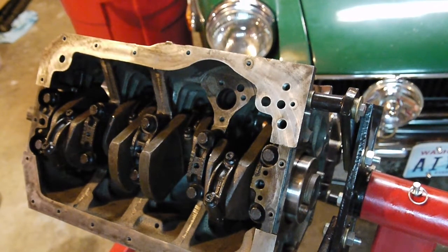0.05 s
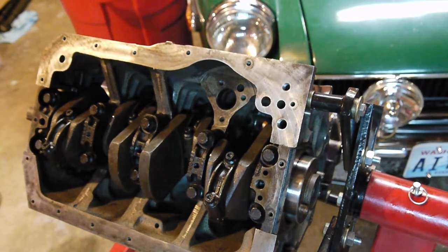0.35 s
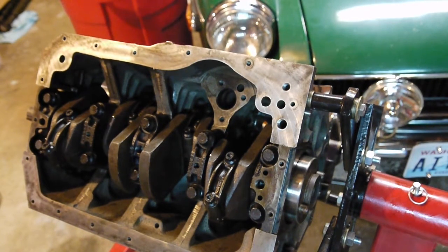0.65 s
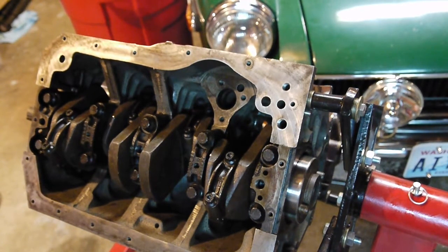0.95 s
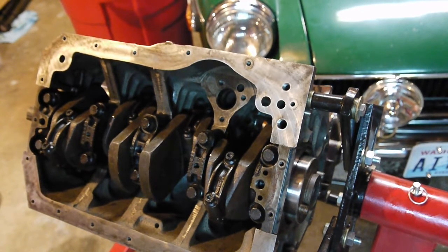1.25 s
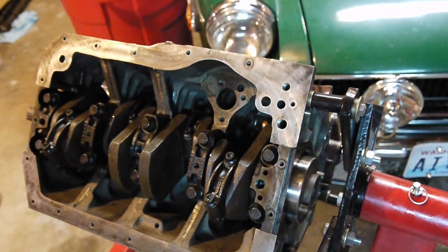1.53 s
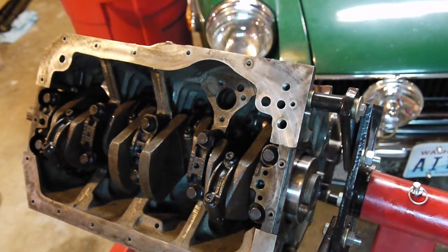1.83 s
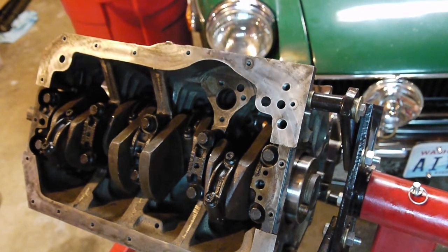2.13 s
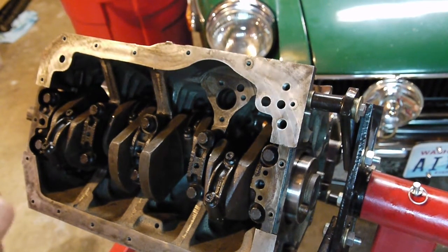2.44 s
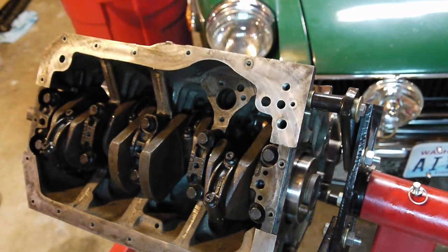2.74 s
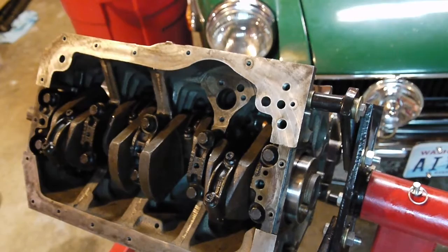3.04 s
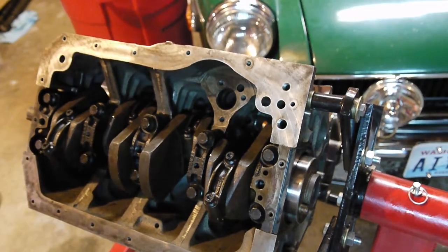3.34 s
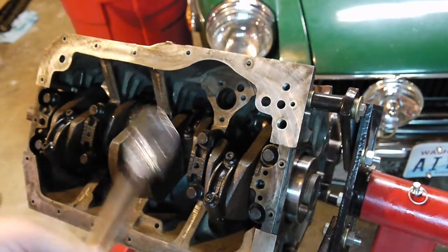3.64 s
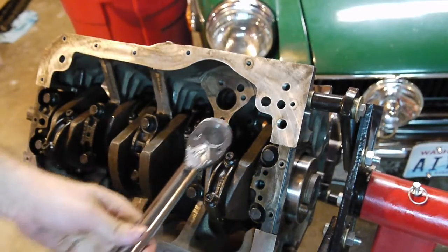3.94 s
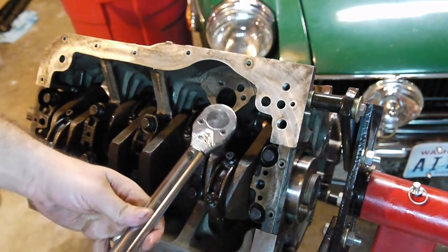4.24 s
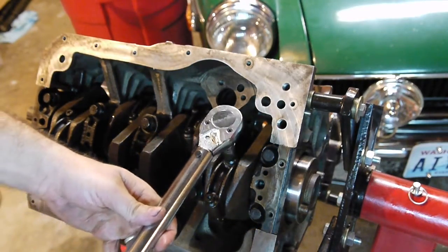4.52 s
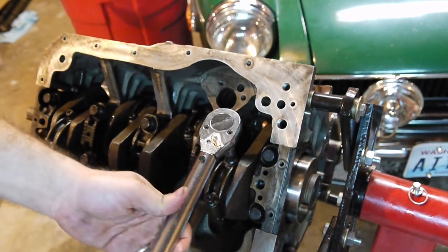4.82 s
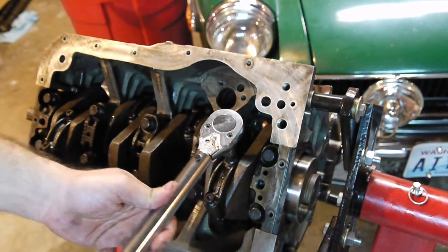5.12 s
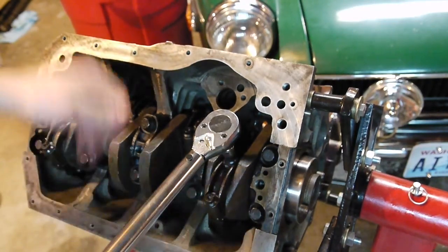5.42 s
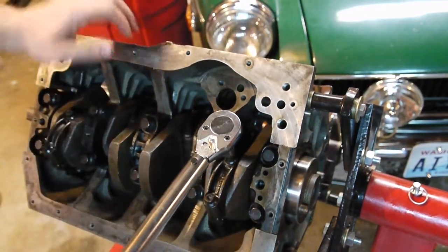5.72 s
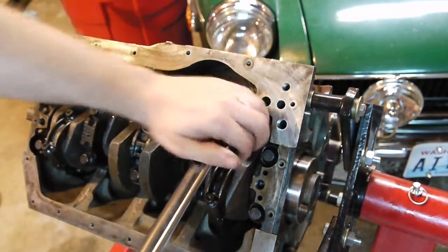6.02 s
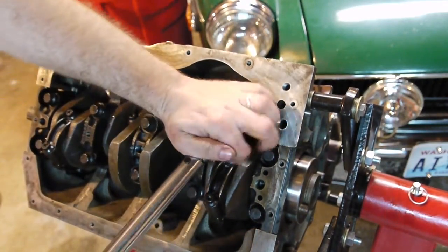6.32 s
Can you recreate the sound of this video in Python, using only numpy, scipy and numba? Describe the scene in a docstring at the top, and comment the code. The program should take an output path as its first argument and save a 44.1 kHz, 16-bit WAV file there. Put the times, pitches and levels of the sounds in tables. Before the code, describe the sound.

A torque wrench clinks softly as it is handled, then clacks onto a bolt between swishes of cloth, over faint room hiss.

```python
"""Light steel clicks and a short scrape as a torque wrench is picked up in a small workshop.
A sleeve swishes as the arm reaches over, the socket clacks down onto a bearing-cap bolt of a bare
engine block, and a hand settles on the ratchet head. Contacts crack and ring the tool's modes;
cloth and skin hiss as they slide. One close microphone, steady room air, faint lamp hum."""
import sys
import numpy as np
from scipy import signal
from scipy.fft import rfft, irfft
from scipy.io import wavfile
from scipy.ndimage import uniform_filter1d
from numba import njit

SR = 44100
rng = np.random.default_rng(int(sys.argv[2]) if len(sys.argv) > 2 else 0)


def transcribe(signal):
    """Save signal, clipped to [-1, 1], as a 16-bit WAV file at the path in sys.argv[1]."""
    frames = np.atleast_2d(signal).T
    limited = np.clip(frames, -1, 1)
    pcm = np.round(limited * 32767).astype(np.int16)
    wavfile.write(sys.argv[1], SR, pcm)


N = 280808
T = np.arange(N) / SR

# Spectrum of a steel contact. Each row: frequency in Hz, level in dB.
STEEL_SPECTRUM = [(100, -29), (350, -14), (1000, -7.5), (1900, -3), (2800, -1.5), (4000, -0.5),
                  (4850, -3.5), (5700, -1.5), (7800, -6), (9700, -4.5), (12500, -11.5), (15500, -26)]
# Modes of the wrench with its socket. Each row: frequency in Hz, level in dB, t60 in seconds.
WRENCH_MODES = [(1647, -5.5, 0.15), (2205, -0.5, .22), (2630, 0, 0.17), (2810, 4, 0.19), (3250, -17, .13),
                (3680, -12, .12), (4150, -3, .24), (4100, -6, 0.11), (4550, -4, 0.14), (4440, -12, 0.42),
                (5230, -5, 0.098), (5450, -5, 0.067), (5450, -11, 0.057), (6250, -14, 0.22),
                (7004, -14, .15), (8650, -7, 0.13)]
# Modes of the ratchet head. Each row: frequency in Hz, level in dB, t60 in seconds.
HEAD_MODES = [(1274, -10, 0.29), (6200, -19, 0.41), (9680, 1, 0.17), (9950, 0, 0.12)]


def socket_clacks(head_db=-5.5, rebounds=2, rebound_s=0.0052, rebound_step_db=0.5):
    """One edge touches the bolt, the full blow follows and rings the tool, then the socket rattles."""
    # Each row: touch time in seconds, touch level in dB, touch resonance in Hz, lag to the blow in
    # seconds, blow level in dB, blow resonance in Hz, chatter t60 in seconds, then rattle level,
    # body boost, treble boost and ring level in dB.
    clacks = [ (4.3922, -22, 3900, 0.0027, -19.5, 5600, 0.0083, -27, -19, -1.5, -43),
              (4.4612, -26.5, 6950, 0.0041, -27, 4450, 0.03, -43, 4, 7, -42.5),
              (4.549, -38.5, 2210, 0.0035, -27.5, 2460, 0.015, -58, -3.5, -1, -40.5)]
    out = np.zeros(N)
    for (touch_s, touch_db, touch_hz, lag_s, blow_db, blow_hz, t60_s,
         rattle_db, body_db, treble_db, ring_db) in clacks:
        blow_s = touch_s + lag_s
        add(out, touch_s, undb(touch_db) * crack(STEEL_SPECTRUM, t60_s, body_db, treble_db, touch_hz))
        add(out, blow_s, undb(blow_db) * crack(STEEL_SPECTRUM, t60_s, body_db, treble_db, blow_hz))
        add(out, blow_s, undb(ring_db) * (ring(WRENCH_MODES) + undb(head_db) * ring(HEAD_MODES)))
        for k in range(rebounds):
            rebound = crack(STEEL_SPECTRUM, t60_s=0.026, treble_db=9, ping_hz=touch_hz)
            add(out, blow_s + (k + 1) * rebound_s, undb(rattle_db + k * rebound_step_db) * rebound)
    return out


def wrench_clicks(ring_offset_db=-9.5):
    """Handling contacts crack and ring shaft and head; heavier ones thud; the loose socket snaps once."""
    # Each row: start in seconds, level in dB, body and treble boosts in dB, contact resonance in Hz,
    # chatter t60 in seconds, wrench and head ring in dB re level plus ring_offset_db.
    clicks = [ (0.473, -49.5, 10, -6, 1200, 0.022, -20, -35), (0.651, -48, 18, -4, 2970, 0.028, -20, -40),
              (1.5304, -39.5, 20.5, 7, 7100, 0.021, -20, -29),
              (1.6122, -36.5, 6, 2.5, 6570, 0.02, -20, -28), (1.6884, -34, 7, -4, 1250, 0.02, -13, -28),
              (1.76, -40.5, 4, -10, 3980, 0.057, 0, -30), (2.067, -50.5, 8, -17, 1600, 0.037, -14, -40),
              (2.555, -37, 1.5, -4.5, 2880, 0.01, -11, -35),
              (2.5844, -40.5, 10.5, 3, 1020, 0.019, -22, -35), (2.6155, -49, -2, -10, 3000, .006, -20, -40),
              (4.5695, -43, -7, 18, 9800, 0.009, -16, -20), (4.9117, -53, 9, -19, 3200, .015, -9, -35),
              (6.1072, -31, 5, -1, 6500, 0.02, -10, -1.5), (6.162, -49, 2, -10, 10200, .012, -22, -14),
              (6.3041, -46, -5, -21, 1700, .012, -20, -22), (6.3077, -38, 10, -6.5, 10000, .013, -19, -0.5)]
    # Each row: start in seconds, level in dB.
    thuds = [(2.5859, -44), (6.1066, -45)]
    # Each row: frequency in Hz, level in dB, t60 in seconds.
    thud_modes = [(398, 0, 0.055), (467, 0, 0.057), (860, -4.5, 0.06)]
    # Socket against its drive square, heard as one snap. Each row: start in seconds, level in dB.
    snap_contacts = [(4.0075, -30), (4.0079, -27), (4.0084, -27)]
    # Each row: frequency in Hz, level in dB.
    snap_spectrum = [(300, -36), (1800, -14), (3500, -1), (6000, -12), (9500, -10), (11600, 0.5),
                     (12500, -2), (13800, -15), (15500, -24)]
    out = np.zeros(N)
    for start_s, db, body_db, treble_db, ping_hz, t60_s, wrench_db, head_db in clicks:
        add(out, start_s, undb(db) * crack(STEEL_SPECTRUM, t60_s, body_db, treble_db, ping_hz))
        ringing = undb(wrench_db) * ring(WRENCH_MODES) + undb(head_db) * ring(HEAD_MODES)
        add(out, start_s, undb(db + ring_offset_db) * ringing)
    for start_s, db in thuds:
        add(out, start_s, undb(db) * ring(thud_modes))
    for start_s, db in snap_contacts:
        add(out, start_s, undb(db) * crack(snap_spectrum, t60_s=0.0047))
    return out


def tool_drag(level_db=-45, jerks_per_s=2200, scatter_db=3, ring_db=-11):
    """Steel slips over a rough surface in dense little jerks, which also ring the wrench."""
    # Each row: frequency in Hz, level in dB.
    drag_spectrum = [(300, -17), (850, -9), (1300, 6.5), (1650, 0), (2200, -3), (3000, 4), (5000, -10),
                     (7000, -9), (9900, -1.5), (12000, -16), (15500, -30)]
    jerks = (rng.random(N) < jerks_per_s / SR) * rng.choice([-1, 1], N)
    jerks = jerks * undb(scatter_db * rng.standard_normal(N))
    lift = envelope(start_s=1.688, end_s=1.762, attack_s=0.007, release_t60_s=0.054)
    scrape = undb(level_db) * unit(colour(jerks, drag_spectrum)) * lift
    ringing = signal.fftconvolve(scrape, ring(WRENCH_MODES))[:N]
    return scrape + undb(ring_db) * np.std(scrape) * unit(ringing)


def sleeve_swish(flutter_db=1.3, pressed_db=-40):
    """Countless fibres slip at once: a hiss, hollow on light strokes, even with the folds pressed flat."""
    # Cloth sliding on cloth. Each row: frequency in Hz, level in dB.
    cloth_spectrum = [(300, -33), (450, -7.5), (620, -8.5), (1000, -7.5), (1500, -8.5), (2050, -9),
                      (2900, -1.5), (3800, -0.5), (4800, -2.5), (5900, -4.5), (7700, -10), (11500, -16),
                      (13500, -29), (15800, -41)]
    # Hollow colour of loose folds. Each row: frequency in Hz, gain in dB.
    fold_response = [(400, -2), (620, 4), (1000, 0.5), (1500, -4.5), (2300, 0), (3250, 1.5), (5100, -1),
                     (6000, 3.5), (7300, -1), (9200, 4.5), (10200, 4), (11500, 6)]
    bands_hz = [(380, 2000), (2000, 7200), (7200, 17000)]  # body, hiss, fine hiss
    fibres = colour(rng.standard_normal(N), cloth_spectrum)
    hollow = colour(fibres, fold_response)
    gains = sleeve_gains()
    loose = 1 / (1 + (gains[1] / undb(pressed_db)) ** 3)
    out = np.zeros(N)
    for gain, edges_hz in zip(gains, bands_hz):
        out += gain * ((1 - loose) * unit(band(fibres, *edges_hz)) + loose * unit(band(hollow, *edges_hz)))
    return out * undb(flutter_db * wander(rate_hz=60))


def sleeve_gains():
    """Gains of body, hiss and fine hiss: strokes swell to their fastest moment, ease off, add in power."""
    # Each row: start, fastest moment and end in seconds, level in dB, slope in dB per second,
    # body and fine hiss in dB re the hiss.
    strokes = [ (3.183, 3.23, 3.29, -52.5, 35, -4, -4), (3.285, 3.461, 3.545, -45, 63, -8, 0),
               (3.504, 3.543, 3.571, -41.5, 68, -6.5, -8), (3.689, 3.8, 3.87, -54, 30, -13.5, -6),
               (3.815, 4.106, 4.187, -32.5, 33.5, -9.5, -5), (4.938, 5.08, 5.09, -59.5, 38, -12, 4),
               (5.38, 5.78, 6.1, -53.5, 18, -4, -8), (5.5, 5.637, 5.64, -29.5, 100, -14.5, -7)]
    power = np.zeros((3, N))
    for start_s, fastest_s, end_s, db, slope_db_per_s, body_db, fine_db in strokes:
        swell = undb(db - slope_db_per_s * np.abs(T - fastest_s))
        gain = swell * envelope(start_s, end_s, attack_s=0.049, release_t60_s=0.3)
        power += np.outer(undb([body_db, 0, fine_db]), gain) ** 2
    return np.sqrt(power)


def hand_brushes(relative_width=0.48):
    """Skin slides over steel in short, soft swells."""
    # Each row: peak time in seconds, length in seconds, level in dB, band centre in Hz.
    brushes = [(0.46, .05, -61.5, 8000), (1.81, 0.041, -55.5, 11000), (2.12, .04, -60, 10500),
               (2.33, 0.14, -62.5, 10700), (2.805, .025, -61.5, 10000), (3.06, 0.14, -63.5, 10400),
               (4.983, 0.036, -57, 5400), (5.074, .07, -58.5, 5000), (6.214, 0.13, -65, 3450)]
    out = np.zeros(N)
    for peak_s, length_s, db, hz in brushes:
        swell = np.exp(-(2 * (T - peak_s) / length_s) ** 2)
        out += undb(db) * swell * noise_band(hz, relative_width * hz)
    return out


def workshop_echoes(x, early_db=-9, early_t60_s=0.14, tail_db=-13, tail_t60_s=0.42, size=24000):
    """Block and floor throw back near echoes; the walls add a short, duller tail."""
    # Each row: frequency in Hz, level in dB.
    wall_spectrum = [(200, 3.0), (4500, -2.5), (9000, -3.5), (15000, -9.5)]
    t = T[:size]
    early = rng.standard_normal(size) * (rng.random(size) < 0.15)
    early *= (t > 0.002) * fade(t, early_t60_s)
    tail = colour(rng.standard_normal(size), wall_spectrum)
    tail *= np.clip(t / 0.016 - 0.5, 0, 1) * fade(t, tail_t60_s)  # builds from 8 to 24 ms
    echoes = undb(early_db) * early / np.linalg.norm(early) + undb(tail_db) * tail / np.linalg.norm(tail)
    return x + signal.fftconvolve(x, echoes)[:N]


def lamp_hum(mains_hz=60):
    """The lamps hum, and sizzle on each half cycle of the mains, unevenly for the two halves."""
    # Each row of both: centre in Hz, width in Hz, level in dB.
    hum_bands = [(118.6, 3, -79.5), (241, 4.1, -71.5)]
    sizzle_bands = [(10030, 300, -76.5), (10900, 480, -72.5)]
    hum = sum(undb(db) * noise_band(hz, width_hz) for hz, width_hz, db in hum_bands)
    sizzle = sum(undb(db) * noise_band(hz, width_hz) for hz, width_hz, db in sizzle_bands)
    mains = np.cos(2 * np.pi * mains_hz * T)
    pulses = unit((0.3 + mains ** 8) * (1 + 0.2 * mains))
    return hum + pulses * sizzle


def room_air(level_db=-55, drift_db=0.34):
    """Room air and microphone hiss, nearly constant in level."""
    # Each row: frequency in Hz, level in dB.
    air_spectrum = [(25, -32), (50, -13), (100, -6), (170, -1.5), (330, 0.5), (600, -1), (1200, -5.5),
                    (2500, -9.5), (5000, -14.5), (9000, -20), (11500, -18), (13000, -24.5), (15800, -30.5)]
    noise = unit(colour(rng.standard_normal(N), air_spectrum))
    return noise * undb(level_db + drift_db * wander(rate_hz=5.14))


def crack(spectrum, t60_s, body_db=0, treble_db=0, ping_hz=0, ping_db=7, ping_width=0.27, size=4096):
    """Burst of dense, quickly damped vibration, with the energy of 5 ms at rms 1."""
    hz = np.fft.rfftfreq(size, 1 / SR)
    db = spectrum_db(spectrum, hz)
    db += body_db / (1 + ((hz - 1400) / 700) ** 2)
    db += treble_db * (1 - 1 / (1 + (hz / 5500) ** 4))
    if ping_hz:  # stiffer, lighter contacts resonate higher
        db += ping_db / (1 + ((hz / ping_hz - 1) / ping_width) ** 2)
    burst = rfft(rng.standard_normal(size) * fade(T[:size], t60_s))
    burst /= np.sqrt(uniform_filter1d(np.abs(burst) ** 2, size=150))  # whiten
    # minimum phase: nothing sounds before the contact
    cepstrum = irfft(np.log(undb(db)))
    cepstrum[1:size // 2] *= 2
    cepstrum[size // 2:] = 0
    x = irfft(burst * np.exp(rfft(cepstrum)))[:size // 2]
    return x / np.sqrt(np.sum(x ** 2) / (0.005 * SR))


def ring(modes, scatter_db=2, detune=0.00075, size=20000):
    """Freely decaying modes; each blow meets them at a different spot."""
    t = T[:size]
    out = np.zeros(size)
    for hz, db, t60_s in modes:
        level_draw, pitch_draw, sign_draw = rng.standard_normal(3)
        gain = undb(db + scatter_db * level_draw) * np.sign(sign_draw)
        out += gain * fade(t, t60_s) * np.sin(2 * np.pi * hz * (1 + detune * pitch_draw) * t)
    return out / np.sqrt(sum(undb(db) ** 2 for _, db, _ in modes) / 2)


def noise_band(centre_hz, width_hz):
    """Noise in one bell-shaped band, rms 1."""
    hz = np.fft.rfftfreq(N, 1 / SR)
    bell = np.exp(-2 * ((hz - centre_hz) / width_hz) ** 2)
    return unit(irfft(rfft(rng.standard_normal(N)) * bell, N))


def wander(rate_hz):
    """Smooth random curve with a spread near 1."""
    step = max(int(SR / rate_hz), 1)
    return uniform_filter1d(np.repeat(rng.standard_normal(N // step + 1), step), step)[:N]


def envelope(start_s, end_s, attack_s, release_t60_s):
    """Rise smoothly, hold until end_s, die away."""
    rise = np.clip((T - start_s) / attack_s, 0, 1)
    return np.sin(np.pi / 2 * rise) ** 2 * fade(np.maximum(T - end_s, 0), release_t60_s)


def fade(t, t60_s):
    """Exponential decay, 60 dB in t60_s."""
    return np.exp(-np.log(1000) * t / t60_s)


def spectrum_db(spectrum, hz):
    """Interpolate (Hz, dB) rows on a log-frequency axis."""
    row_hz, row_db = np.transpose(spectrum)
    return np.interp(np.log(hz + 1), np.log(row_hz), row_db)


def colour(x, spectrum):
    """Filter by a smooth spectrum."""
    hz = np.fft.rfftfreq(len(x), 1 / SR)
    return irfft(rfft(x) * undb(spectrum_db(spectrum, hz)), len(x))


def band(x, lo_hz, hi_hz):
    """Band-pass."""
    return signal.sosfilt(signal.butter(3, [lo_hz, hi_hz], "bandpass", fs=SR, output="sos"), x)


def add(out, start_s, x):
    """Mix x in at start_s."""
    i = int(start_s * SR)
    out[i:i + len(x)] += x[:N - i]


def undb(db):
    """Decibels to gain."""
    return 10 ** (np.asarray(db) / 20)


def unit(x):
    """Scale to rms 1."""
    return x / np.sqrt(np.mean(x ** 2) + 1e-20)


@njit
def follow(x, attack_s, release_s):
    """Level follower with separate rise and fall times."""
    out, level = np.empty(len(x)), 0.
    for i in range(len(x)):
        level += (x[i] - level) / (SR * (attack_s if x[i] > level else release_s))
        out[i] = level
    return out


def scene():
    """All sources reach one microphone, the same in both channels."""
    handling = wrench_clicks() + socket_clacks() + tool_drag() + sleeve_swish() + hand_brushes()
    mono = workshop_echoes(handling) + lamp_hum() + room_air()
    return np.array([mono, mono])


def record(dry, threshold_db=-35, reduction_db_per_db=0.12, lowpass_hz=15900):
    """Gentle gain control ducks the room after loud sounds; the top is cut."""
    level = follow(np.abs(dry[0]), attack_s=0.0099, release_s=0.61)
    gain = (1 + (level / undb(threshold_db)) ** 2) ** (-reduction_db_per_db / 2)
    lowpass = signal.ellip(10, 0.2, 70, lowpass_hz, fs=SR, output="sos")
    return signal.sosfilt(lowpass, dry * gain)


dry = scene()
out = record(dry)
transcribe(out)
```